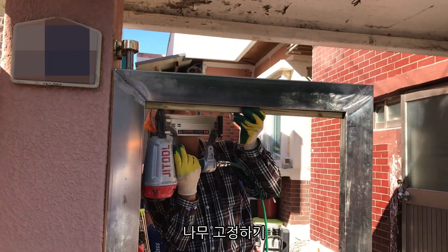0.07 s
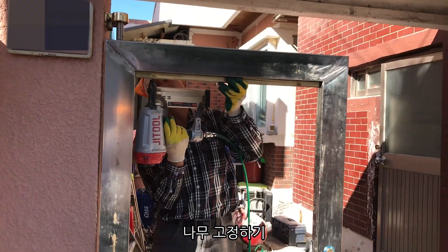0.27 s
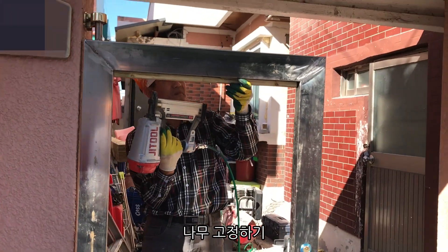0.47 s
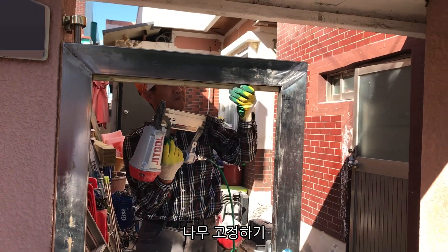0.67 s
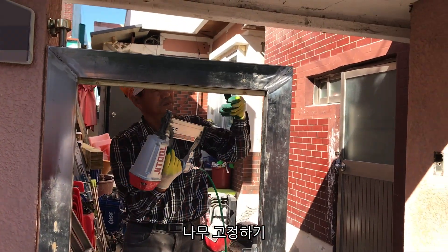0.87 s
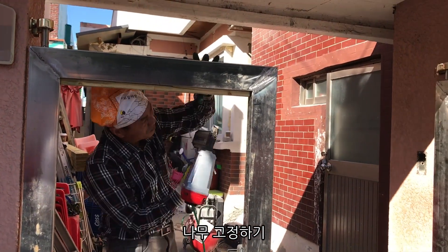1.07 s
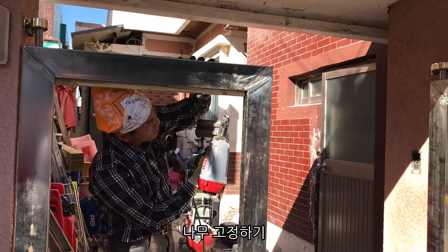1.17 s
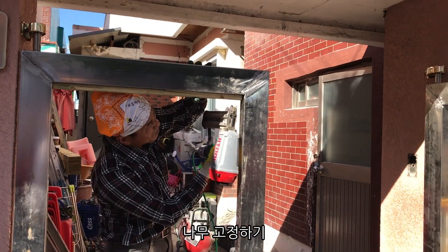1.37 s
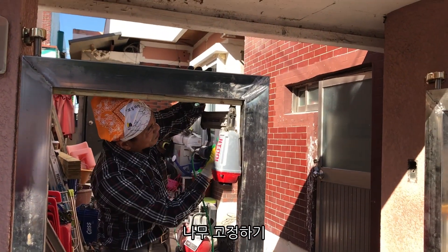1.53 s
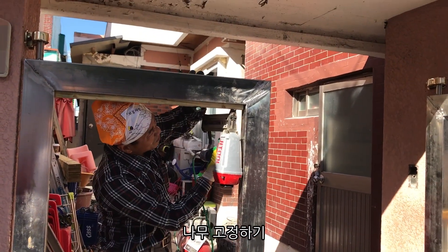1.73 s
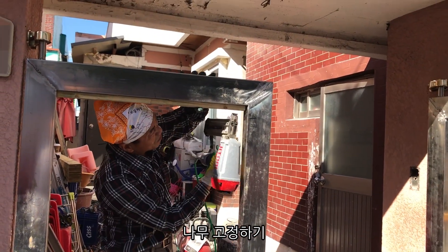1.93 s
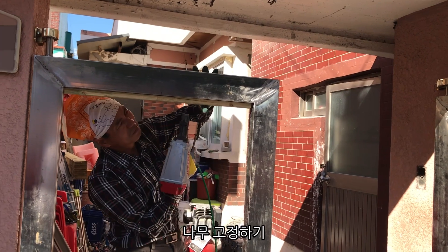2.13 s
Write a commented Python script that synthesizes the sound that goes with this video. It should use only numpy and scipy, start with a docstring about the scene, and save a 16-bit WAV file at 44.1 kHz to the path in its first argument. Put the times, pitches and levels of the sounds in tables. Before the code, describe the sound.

Two loud nail gun bangs crack nearby in a small yard, each with a brief air blast, metallic ring and short echo. Faint clicks, taps and soft bumps fall between the shots, over quiet outdoor air.

```python
"""A narrow house yard: an air nailer fires twice, fixing timber inside a hollow metal door frame.
Each shot is a piston crack, the driver's blow and a blast of exhaust air; the frame rings on
and the walls echo. Between shots the tool rattles and its nose taps the frame, over soft bumps,
outdoor air and a faint machine hum. Automatic gain control ducks the sound on each bang."""
import sys
import numpy as np
from scipy import signal
from scipy.fft import rfft, irfft
from scipy.io import wavfile
from scipy.ndimage import uniform_filter1d

SR = 44100
rng = np.random.default_rng(int(sys.argv[2]) if len(sys.argv) > 2 else 0)


def digitize_waveform(pressure):
    """Quantize a signal to 16-bit integers and store it at the path in sys.argv[1].

    Rows of a 2-D input are taken as channels; values are limited to [-1, 1].
    """
    field = np.atleast_2d(pressure).T
    bounded = np.clip(field, -1, 1)
    quanta = np.round(bounded * 32767).astype(np.int16)
    wavfile.write(sys.argv[1], SR, quanta)


N = 97020


# shot cues (time [s], piston gain [dB], blow gain [dB], exhaust gain [dB], exhaust hold [s],
# frame ring gain [dB])
SHOTS = [(0.2103, -8, -7, -7.5, 0.016, 8.5), (1.8684, -5, -4.5, -7.5, 0.014, 8)]

def nailer():
    """Each shot: a hard crack, an air blast and a clang, then the ringing frame and the yard's echo."""
    out = np.zeros(N)
    for shot, (start, piston_db, blow_db, exhaust_db, hold, ring_db) in enumerate(SHOTS):
        blow_at, ring_at = start + 0.00512, start + 0.01
        out += crack(start, blow_at, shot, piston_db, blow_db)
        out += undb(exhaust_db) * exhaust(blow_at, shot, hold)
        out += clang(blow_at, shot)
        out += undb(ring_db) * frame_ring(ring_at, shot, attack=0.006)
        out += frame_walls(ring_at)
        out += yard_echo(blow_at)
    return out


# tone of the piston crack, one curve per shot (frequency [Hz], relative level [dB])
PISTON_EQ = [
    [(60, -1), (160, -13), (260, -4), (480, -13), (680, 11.5), (860, -25), (1300, 2), (2100, -0.5),
     (3300, -3.5), (5000, -9.5), (16000, -11.5)],
    [(150, -1), (350, -5), (650, 4), (1500, 3), (3000, -8.5), (4600, 0.5), (8000, -12), (16000, -16)],
]
# bright tone of the valve and the driver's blow (frequency [Hz], relative level [dB])
BLOW_EQ = [(100, -18), (600, -7.5), (900, -29), (2090, 4.5), (2970, -9), (4860, 0), (6140, 3), (7750, -9.5),
           (9570, 11.5), (11000, -1.5), (16000, -7)]

def crack(start, blow_at, shot, piston_db, blow_db):
    """The valve ticks, the piston cracks and the driver hits with one N-shaped pressure pulse."""
    valve = undb(-38.5) * noise(BLOW_EQ) * envelope(start - 0.00323, 0.0002, 0, 0.028)
    piston = undb(piston_db) * noise(PISTON_EQ[shot]) * envelope(start, 0.0001, 0.00068, 0.035)
    blow = undb(blow_db) * noise(BLOW_EQ) * envelope(blow_at, 0.0001, 0.00067, 0.027)
    pulse_time = (np.arange(N) / SR - blow_at) / 0.00015
    pulse = undb(-7) * pulse_time * np.exp((1 - pulse_time ** 2) / 2)
    low_cut = signal.butter(1, 110, "high", fs=SR, output="sos")  # the cracks carry little bass
    return signal.sosfilt(low_cut, valve + piston + blow + pulse)


# tone of the exhaust and shaken timber, one curve per way the tool is held
# (frequency [Hz], relative level [dB])
EXHAUST_EQ = [
    [(100, -34), (330, -17.5), (500, -9), (700, -10), (850, -15), (1030, -17), (1250, -4), (1600, -22),
     (2200, -12), (3100, -14), (3760, -5), (4500, -13), (4900, -5.5), (6600, -0.5), (7400, -12.5),
     (9800, -10.5), (16000, -20.5)],
    [(160, -7.5), (230, -12.5), (370, -14.5), (550, -4.5), (1000, -19.5), (1220, 1), (1500, -17),
     (2200, -2), (2450, -12), (3800, -1), (4500, -6), (5900, 1.5), (7300, -3), (7900, -8.5), (9600, -3),
     (16000, -18)],
]

def exhaust(start, shot, hold):
    """Spent air leaves the tool in one short blast."""
    return noise(EXHAUST_EQ[shot]) * envelope(start, 0.0034, hold, t60=0.06)


# modes of tool and timber (frequency [Hz], first shot level [dB], second shot level [dB], t60 [s])
CLANG_MODES = [(183, -37, -15.5, 0.027), (669, -12, -23, 0.054), (1198, -11, -16, 0.1),
               (1355, -17.5, -23, 0.13), (1800, -29, -22, 0.075), (2263, -30, -26, 0.094),
               (4120, -31, -17, 0.13), (5197, -30, -29, 0.12), (5540, -31, -28, 0.11),
               (5780, -26, -19, 0.12), (5997, -17, -14, 0.088), (6468, -9, -31, 0.049),
               (6770, -23, -35, 0.1), (6944, -12, -33, 0.11), (9300, -20, -17, 0.13)]

def clang(start, shot):
    """The blow sets the nailer and the timber ringing briefly."""
    t, attack = since(start), 0.0078
    return sum(undb(levels[shot]) * sine(hz, t) * envelope(start, attack, attack / 2, t60)
               for hz, *levels, t60 in CLANG_MODES)


# modes of the door frame (frequency [Hz], first shot relative level [dB],
# second shot relative level [dB], nose tap relative level [dB], base t60 [s])
FRAME_MODES = [(1147, -42, -45, -66, 0.6), (1206, -42, -47, -46, 0.6), (1238, -48, -46, -40, 0.6),
               (1288, -51, -49, -47, 0.6), (1381, -50, -40, -54, 0.6), (1537, -51, -46, -66, 0.6),
               (2081, -61, -48, -66, 0.6), (3315, -38, -37, -66, 0.52), (3369, -44, -53, -66, 0.52),
               (3513, -41, -59, -66, 0.52), (3585, -46, -46, -66, 0.52), (3844, -57, -46, -66, 0.8),
               (4849, -39, -40, -47, 0.48), (4897, -43, -43, -44, 0.48), (4958, -40, -47, -52, 0.48),
               (5146, -41, -63, -66, 0.48), (5385, -53, -44, -66, 0.36), (6006, -43, -48, -66, 0.36),
               (8771, -41, -58, -66, 0.33), (9238, -42, -50, -54, 0.33), (9278, -45, -53, -66, 0.33),
               (9328, -53, -46, -66, 0.33)]
NOSE_TAP, LANDING_S = 2, 0.12

def frame_ring(start, strike, attack, decay_scale=1):
    """The metal frame rings from a shot (strike 0 or 1) or from a NOSE_TAP."""
    t, out = since(start), np.zeros(N)
    for hz, *levels, t60 in FRAME_MODES:
        rise = 0.1 if 3000 < hz < 4000 else attack  # this band blooms late
        ring = sine(hz, t) * envelope(start, rise, 0, t60 * decay_scale)
        if hz > 4500:  # the recoiling nose lands again and chokes the highs
            ring *= envelope(start, attack, hold=LANDING_S, t60=0.14)
        out += undb(levels[strike]) * ring
    return out


# resonances of the frame walls (centre [Hz], width [Hz], level [dB], t60 [s])
WALL_BANDS = [(1200, 107, -16.5, 0.15), (4866, 170, -17.5, 0.13), (9100, 580, -19, 0.11)]

def frame_walls(start):
    """The hollow frame's walls add a short, dense ring."""
    return sum(undb(db) * band(hz, width) * envelope(start, 0.006, 0, t60)
               for hz, width, db, t60 in WALL_BANDS)


# tone of the echo (frequency [Hz], relative level [dB])
YARD_EQ = [(59, -55), (100, -41), (215, -19), (991, -16), (1170, 12), (1910, -5.5), (3250, -2),
           (4110, -3.5), (4980, 2), (16000, -20.5)]

def yard_echo(start):
    """The close walls of the yard return a diffuse tail."""
    return undb(-27.5) * noise(YARD_EQ) * envelope(start, 0.0078, 0.013, t60=0.42)


# rattle cues (time [s], tail level [dB], tail t60 [s])
RATTLES = [(0.3398, -37, 0.14), (0.4061, -32.5, 0.028), (0.4136, -37.5, 0.15), (0.434, -44, 0.044),
           (0.852, -52, 0.04), (0.926, -49.5, 0.057), (0.9865, -47, 0.029), (1.015, -49, 0.017),
           (1.0347, -42.5, 0.1), (1.043, -41, 0.15), (1.056, -42, 0.081), (1.077, -40, 0.07),
           (1.1607, -54, 0.28)]
# tone of the clicks and ticks (frequency [Hz], relative level [dB])
CLICK_EQ = [(1200, -16), (1900, -7.5), (3400, 0), (5000, -4.5), (8000, -4), (11500, -4.5), (15500, -11)]
# nose taps on the frame (time [s], ring gain [dB], tick level [dB])
TAPS = [(0.768, -18, -57), (1.4879, -14, -53), (1.615, -7, -48), (1.792, -18, -65)]

def handling():
    """Loose parts click as the tool moves, and its nose taps the frame into a soft ring."""
    out = np.zeros(N)
    for start, db, t60 in RATTLES:
        snap = undb(4) * envelope(start, 0.00015, 0, 0.004)
        tail = envelope(start, 0.00024, 0, t60)
        out += undb(db) * noise(CLICK_EQ) * (snap + tail)
    for start, ring_db, tick_db in TAPS:
        out += undb(ring_db) * frame_ring(start, NOSE_TAP, attack=0.0011, decay_scale=0.6)
        out += undb(tick_db) * noise(CLICK_EQ) * envelope(start, 0.00044, 0, 0.05)
    return out


# bump cues (time [s], level [dB])
BUMPS = [(0.906, -62), (1.40, -56), (2.035, -49.5), (2.16, -56)]

def bumps():
    """Handling makes faint low thumps that sink in pitch."""
    out = np.zeros(N)
    start_hz, end_hz, sink_s = 145, 37, 0.0314
    for start, db in BUMPS:
        hz = end_hz + (start_hz - end_hz) * np.exp(-since(start) / sink_s)
        phase = 2 * np.pi * np.cumsum(hz) / SR
        out += undb(db) * np.sin(phase) * envelope(start, 0.011, 0, t60=0.81)
    return out


def drone(start=1.49, end=1.81, hz=50.2):
    """A low tone and its octave sound while the tool is pressed home."""
    phase = 2 * np.pi * hz * since(start)
    tone = undb(-66) * np.sin(phase) + undb(-67.5) * np.sin(2 * phase)
    return tone * envelope(start, 0.033, end - start, t60=0.08)


# partials of the hum (frequency [Hz], relative level [dB])
HUM_PARTIALS = [(226.1, -58), (301.5, -67.5), (452.2, -60.5), (899.0, -68), (1427, -72.5), (1577, -69),
                (1798, -68.5), (1873, -70.5)]

def machine_hum():
    """A distant machine hums, its partials wavering slightly in pitch together."""
    clock = np.cumsum(1 + 0.004 * band(0, 14.4)) / SR
    return undb(-0.5) * np.sqrt(2) * sum(undb(db) * sine(hz, clock) for hz, db in HUM_PARTIALS)


# tone of the outdoor bed (frequency [Hz], relative level [dB])
AIR_EQ = [(18, -92), (30, -69), (116, -13.5), (195, -10.5), (222, -8.5), (328, -15), (448, -12.5),
          (485, -11), (524, -11), (881, -15.5), (1090, -20), (4420, -19.5), (15000, -28.5)]

def outdoor_air():
    """A steady bed of open air, soft at the very top."""
    high_cut = signal.butter(2, 12600, fs=SR, output="sos")
    return undb(-51.5) * signal.sosfilt(high_cut, noise(AIR_EQ))


def undb(db):
    """Decibels to gain."""
    return 10 ** (np.asarray(db) / 20)


def unit(x):
    """Scale to rms 1."""
    return x / np.sqrt(np.mean(x ** 2))


def since(start):
    """Seconds since start, zero before it."""
    return np.maximum(np.arange(N) / SR - start, 0)


def sine(hz, t):
    """A sine with a random starting phase."""
    return np.sin(2 * np.pi * (hz * t + rng.random()))


def envelope(start, attack, hold, t60):
    """Linear attack; from hold seconds after start, a fall of 60 dB every t60 seconds."""
    t = since(start)
    return np.minimum(t / attack, 1) * np.exp(-np.log(1000) * np.maximum(t - hold, 0) / t60)


def noise(eq):
    """Noise shaped by (frequency [Hz], level [dB]) points, rolling off below the first."""
    hz, db = np.array(eq).T
    f = np.maximum(np.fft.rfftfreq(N, 1 / SR), 1)
    gain = undb(np.interp(np.log(f), np.log(hz), db)) * np.minimum(f / hz[0], 1) ** 2
    return unit(irfft(rfft(rng.standard_normal(N)) * gain, N))


def band(hz, width):
    """Noise in one steep resonance."""
    f = np.fft.rfftfreq(N, 1 / SR)
    return unit(irfft(rfft(rng.standard_normal(N)) / (1 + (2 * (f - hz) / width) ** 2), N))


def scene():
    """The mono mix: nailer up front, handling beneath it, hum and air behind."""
    return (nailer() + handling() + bumps() + drone() + machine_hum() + outdoor_air())[None]


def record(dry):
    """Gain control ducks on loud sound, holds and recovers; peaks are rounded and the top is cut."""
    threshold_db, depth_db, hold_s, release_s, ceiling = -23, -6.5, 0.093, 0.14, 0.62
    loud = uniform_filter1d(np.abs(dry[0]), size=64) > undb(threshold_db)
    t = np.arange(N) / SR
    quiet_for = t - np.maximum.accumulate(np.where(loud, t, -10))
    gain = undb(depth_db * np.clip(1 - (quiet_for - hold_s) / release_s, 0, 1))
    limited = ceiling * np.tanh(dry * gain / ceiling)
    high_cut = signal.ellip(10, 0.2, 80, 15900, fs=SR, output="sos")
    return signal.sosfilt(high_cut, limited)


dry = scene()
out = record(dry)
digitize_waveform(out)
```